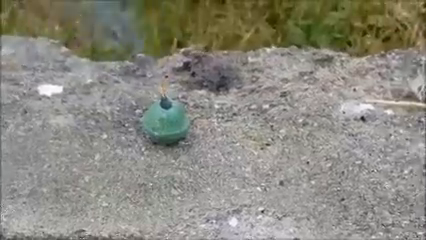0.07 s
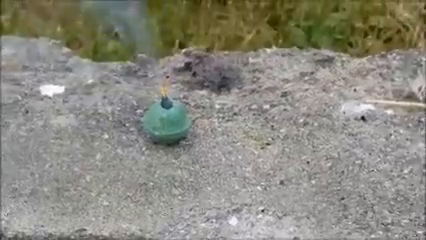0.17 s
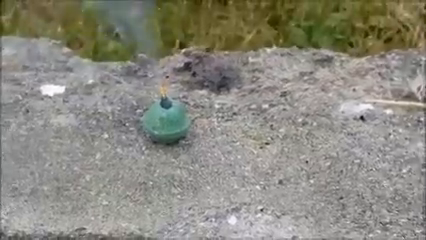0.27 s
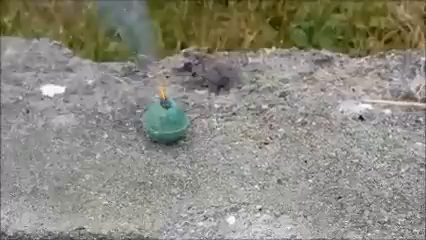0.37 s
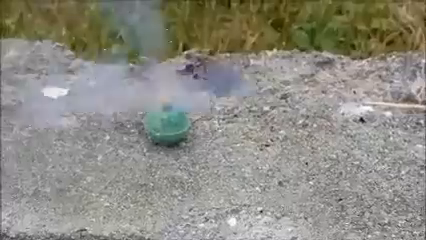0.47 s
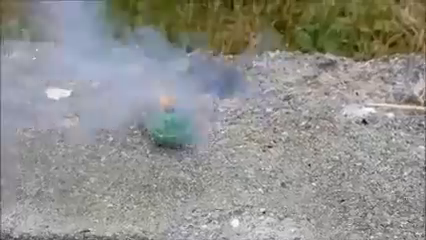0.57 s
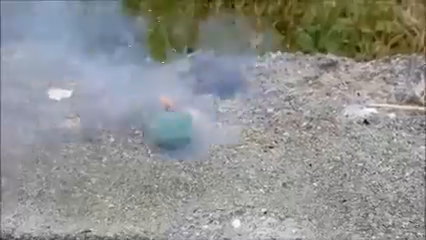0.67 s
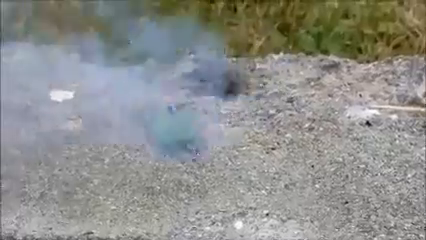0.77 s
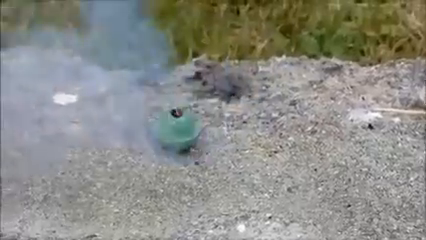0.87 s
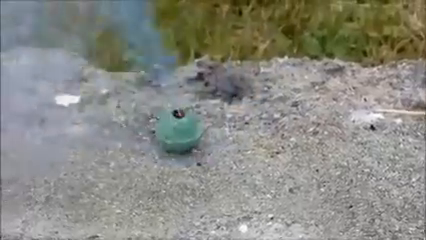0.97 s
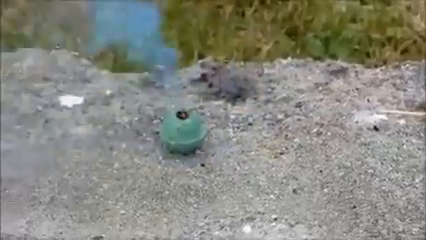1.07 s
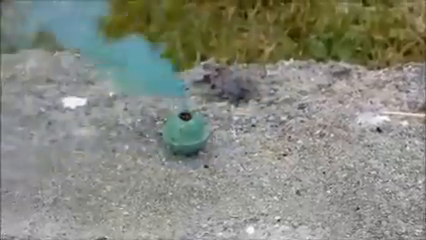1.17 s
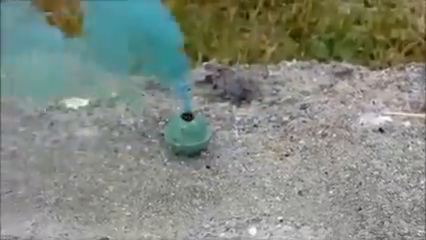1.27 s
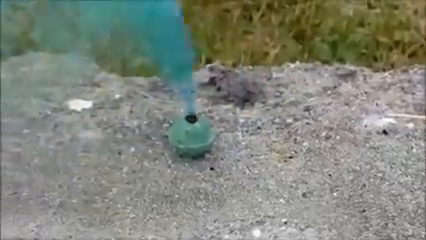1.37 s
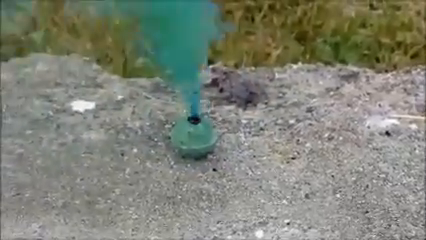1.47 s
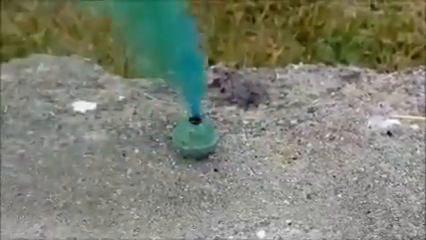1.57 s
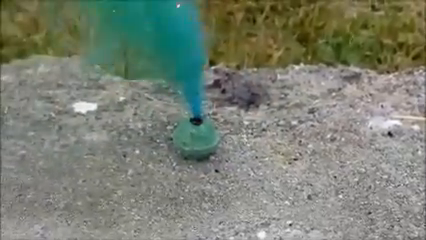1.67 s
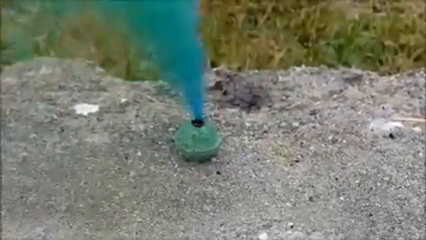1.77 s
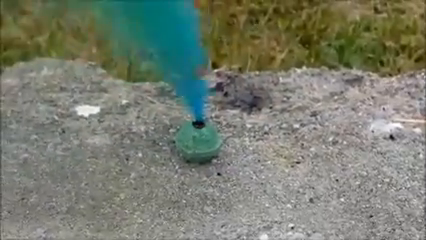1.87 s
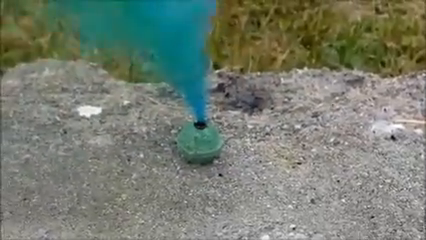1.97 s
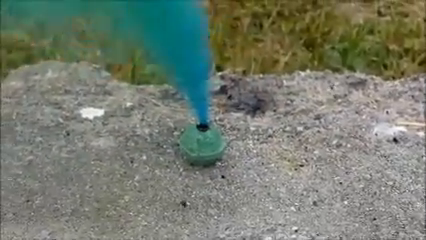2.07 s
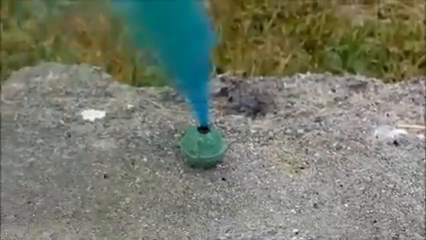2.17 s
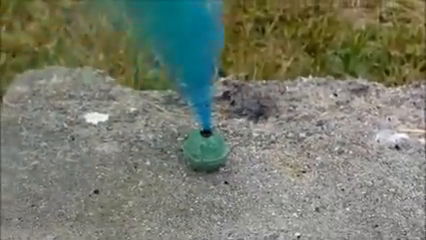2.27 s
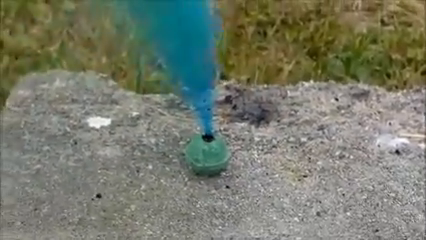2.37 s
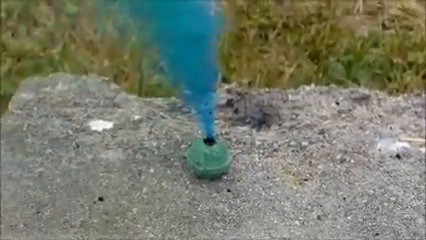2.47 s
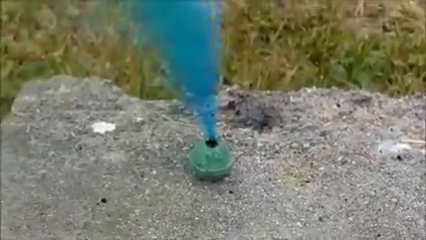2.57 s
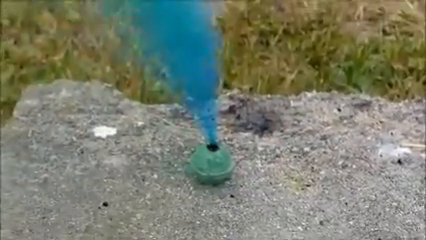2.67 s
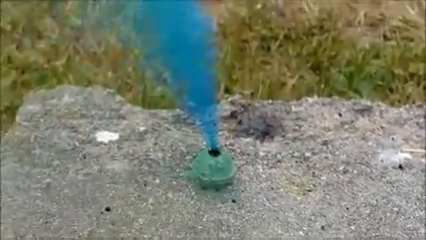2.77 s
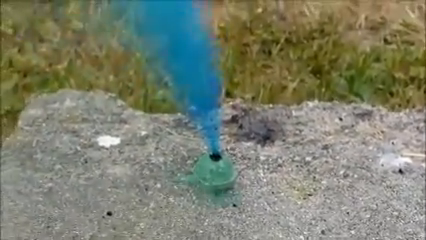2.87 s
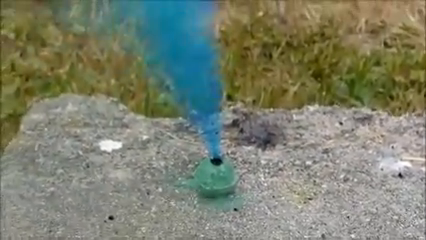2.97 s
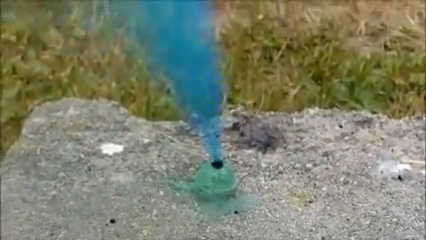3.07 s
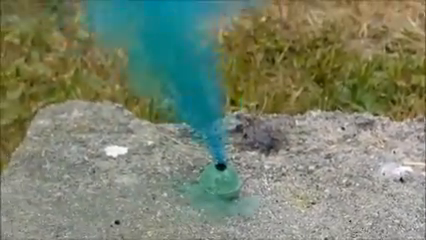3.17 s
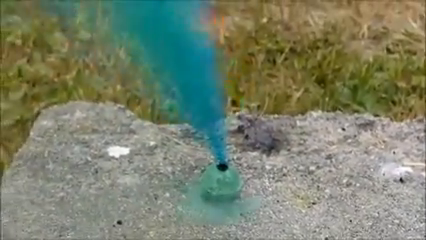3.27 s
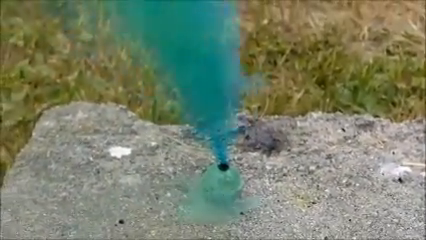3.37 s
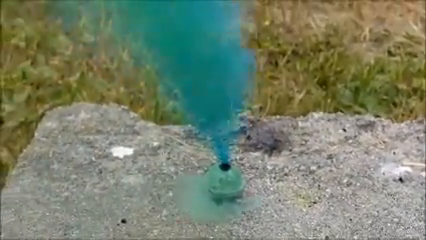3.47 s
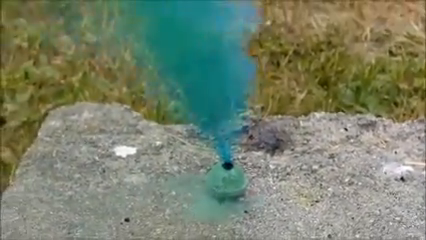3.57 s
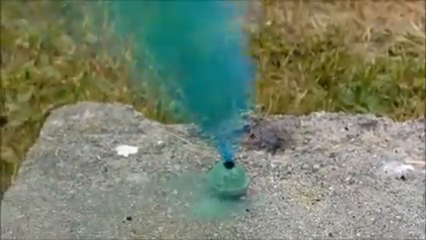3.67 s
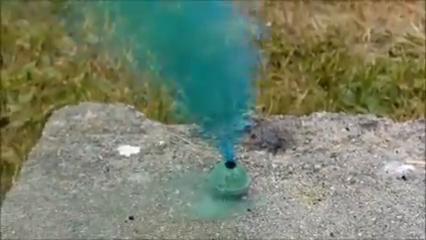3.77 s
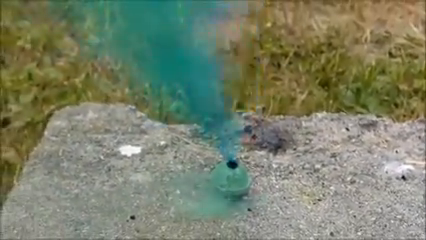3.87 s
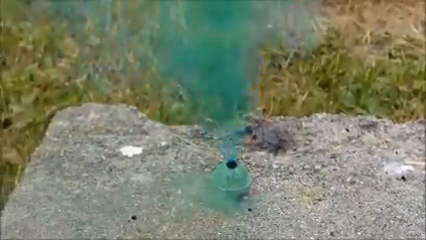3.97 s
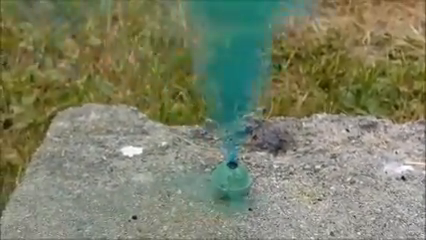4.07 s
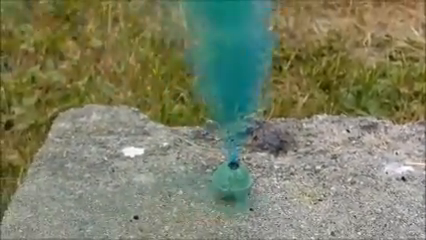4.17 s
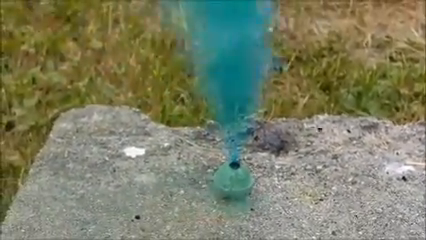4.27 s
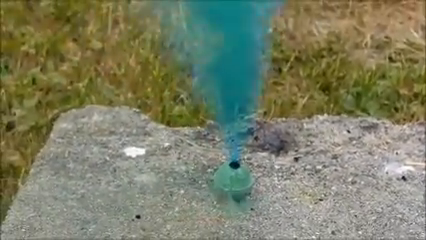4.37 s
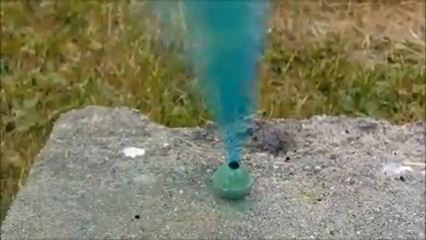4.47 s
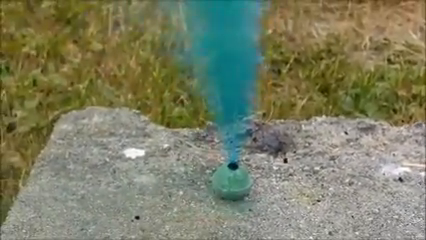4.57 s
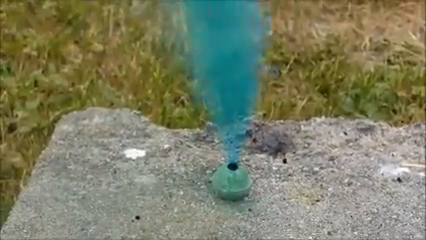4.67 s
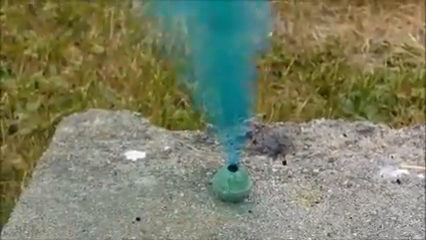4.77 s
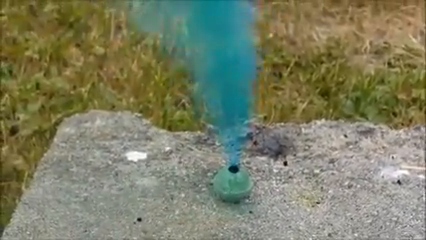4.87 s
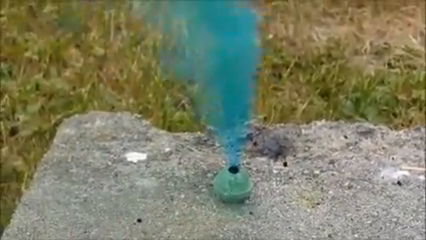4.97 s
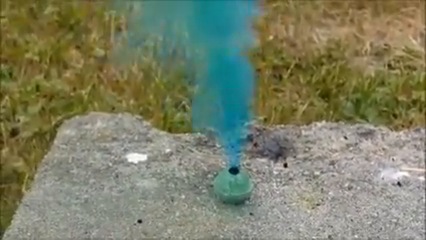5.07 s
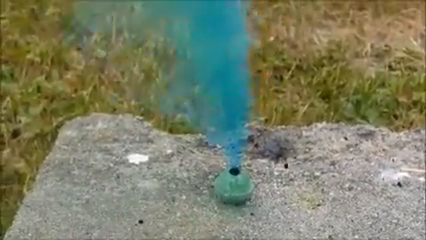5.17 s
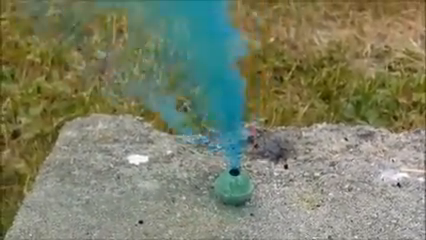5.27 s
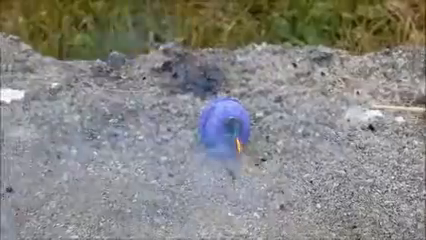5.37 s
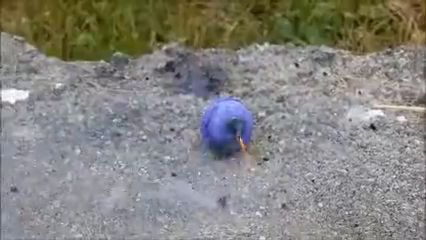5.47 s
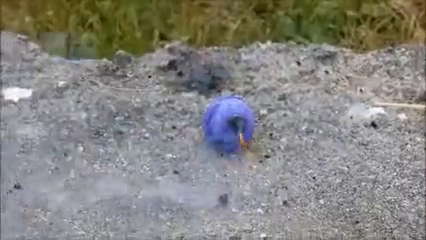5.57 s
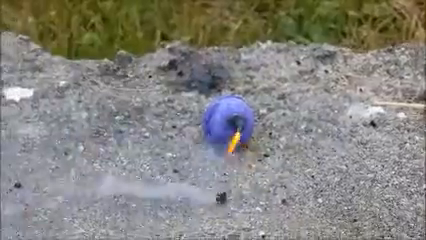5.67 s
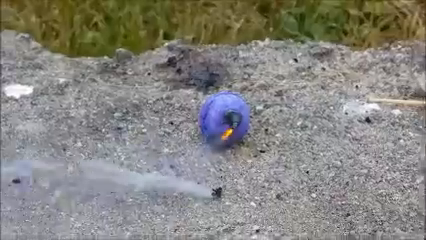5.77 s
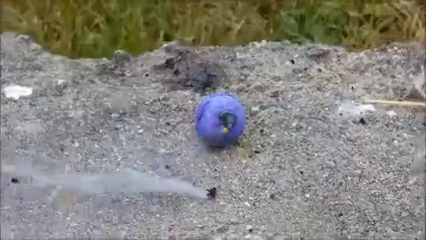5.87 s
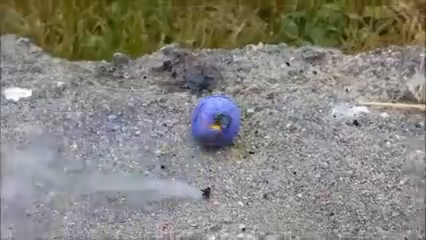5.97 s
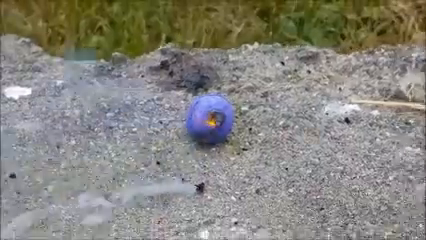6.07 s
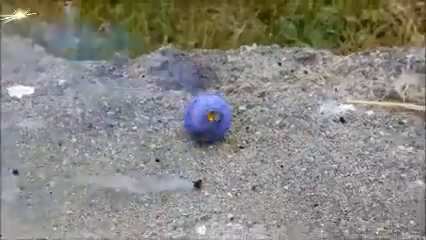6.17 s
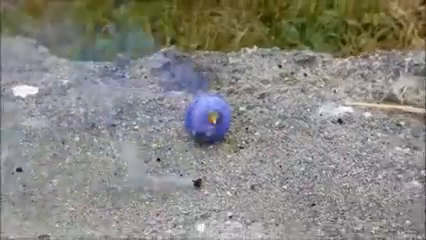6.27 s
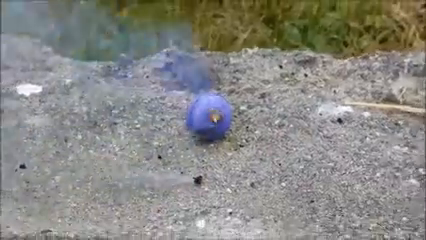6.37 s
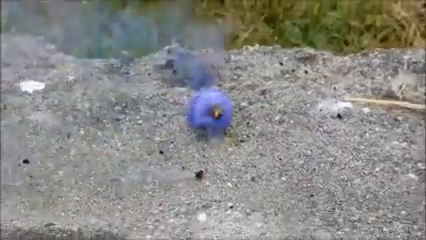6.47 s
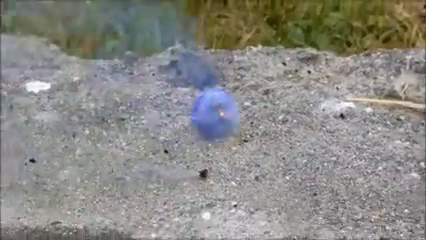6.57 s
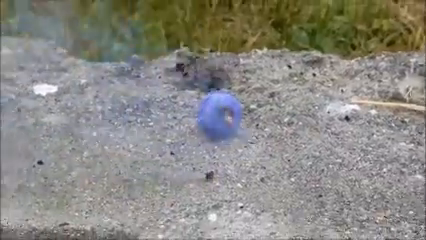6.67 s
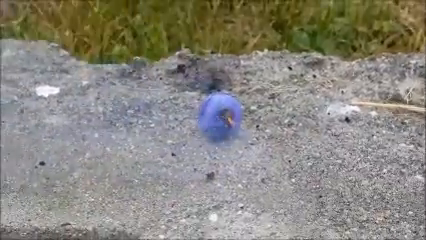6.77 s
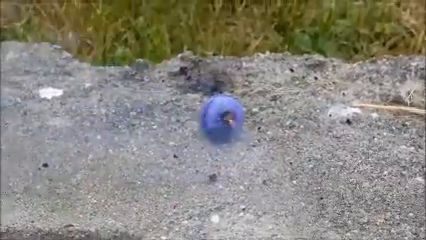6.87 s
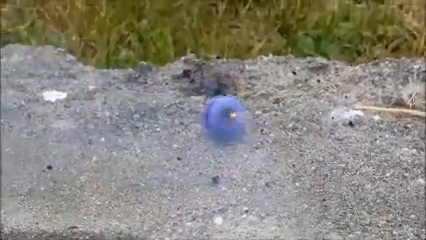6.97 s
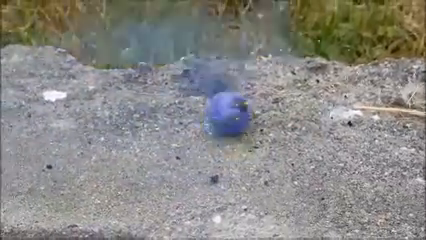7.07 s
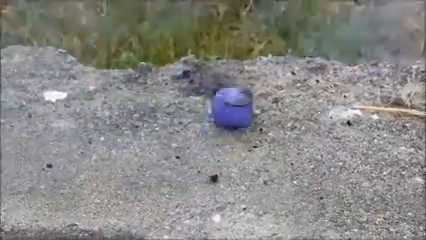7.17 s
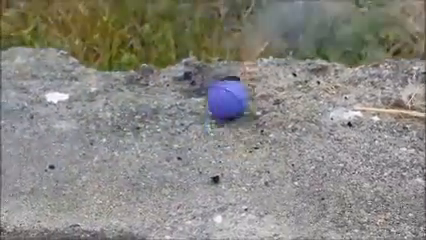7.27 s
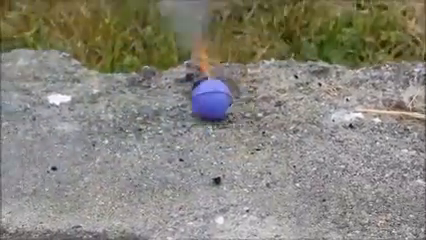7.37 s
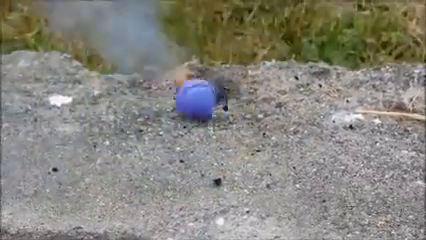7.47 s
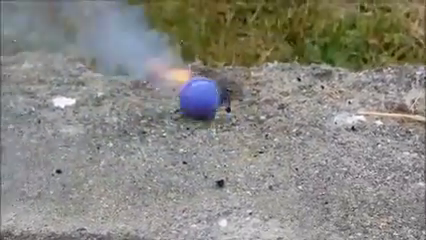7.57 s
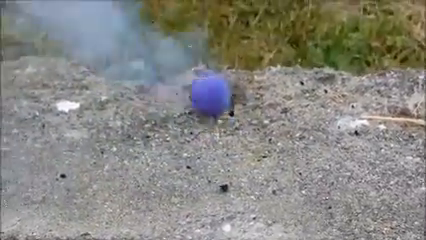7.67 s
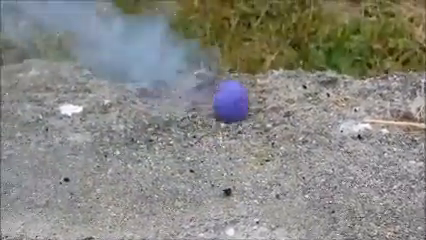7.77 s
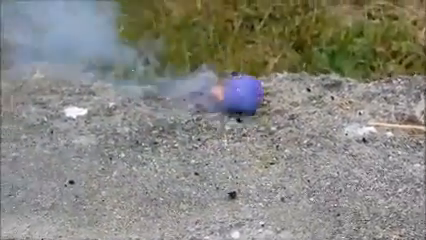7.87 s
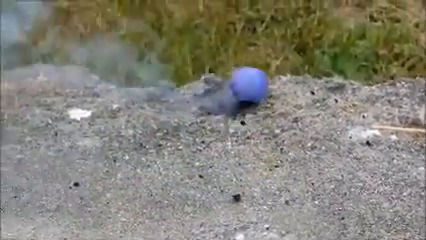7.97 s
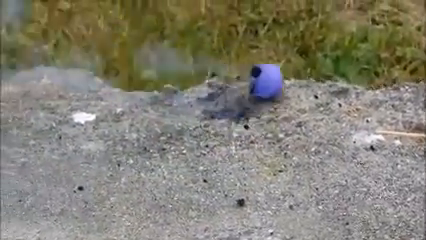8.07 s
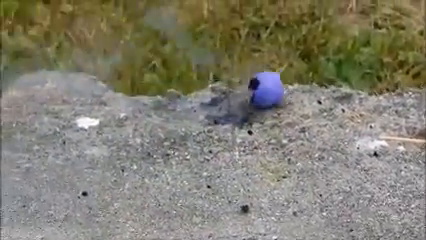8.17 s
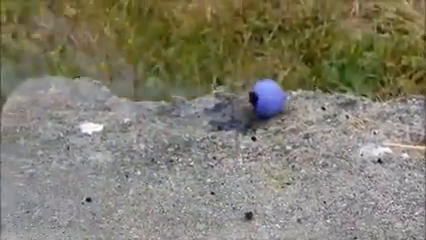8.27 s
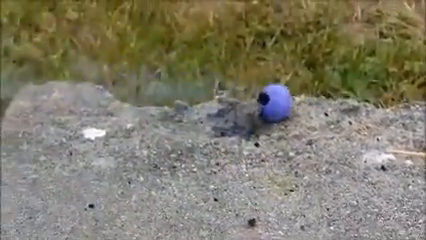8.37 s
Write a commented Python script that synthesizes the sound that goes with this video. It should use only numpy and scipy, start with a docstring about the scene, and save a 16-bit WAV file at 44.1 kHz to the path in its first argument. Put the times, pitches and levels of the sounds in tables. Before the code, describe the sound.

A smoke ball's fuse fizzes, stalls, then hisses into a swelling jet that fades; a second sputters, flares and dies over faint rumble.

```python
"""Far machinery rumbles and hums while two smoke balls burn in turn on a concrete slab, heard in stereo.
A fuse fizzes and stalls; then a green jet swells and dies, its slag popping as noise cracks and damped
sines; a bird whistles in gliding sines; a blue ball sputters, flares and goes out to a faint ember hiss.
Each burn is gas noise and spark impulses, coloured by the vent, with four registers tied to the jet."""
import sys
import numpy as np
from scipy import signal
from scipy.fft import rfft, irfft
from scipy.io import wavfile
from scipy.ndimage import uniform_filter1d

SR = 44100
rng = np.random.default_rng(int(sys.argv[2]) if len(sys.argv) > 2 else 0)


def file_out(sig):
    """Save sig as 16-bit WAV at sys.argv[1]."""
    # one column per channel
    cols = np.atleast_2d(sig).T
    # limit, then scale
    lim = np.clip(cols, -1, 1)
    pcm = np.round(lim * 32767).astype(np.int16)
    wavfile.write(sys.argv[1], SR, pcm)


N = 371322

# stereo transfer of the blue ball and the embers to the two microphone ports:
# (frequency [Hz], left-right level [dB], coherence [0-1], left lead [rad])
BLUE_PORTS = [(520, 2.5, .77, .3), (900, 6.3, .67, .7), (1300, 11.1, .53, .9), (1600, 14.2, .68, .3),
              (2400, 11.6, .62, .3), (3300, 6.7, .52, -.5), (4200, 1.6, .6, .2), (5500, 4.4, .4, -.6),
              (7800, 1.2, .35, 1.6), (9600, -2, .15, .7), (12000, 4, .25, -1.8), (15000, -.6, .3, -2.7)]


def gain_of(db):
    """Level law: 20 dB is a factor of ten in amplitude."""
    return 10 ** (np.asarray(db) / 20)


def evened(x):
    """Normalisation of mean power: scales to rms 1."""
    return x / np.sqrt(np.mean(x ** 2) + 1e-20)


def read(rows, hz):
    """Spectral interpolation: every column joined by straight lines over log frequency."""
    f, *columns = np.transpose(rows)
    return [np.interp(np.log(hz + 1), np.log(f + 1), c) for c in columns]


def follow(rows, t):
    """Temporal interpolation: every column joined by straight lines over time."""
    s, *columns = np.transpose(rows)
    return [np.interp(t, s, c) for c in columns]


def add(mix, s, sound):
    """Superposition: adds a sound to the mix from time s."""
    part = mix[round(s * SR):][:len(sound)]
    part += sound[:len(part)]


def wander(t, rate_hz):
    """Low-passed random fluctuation of rms 1, mostly slower than rate_hz."""
    bin_hz = np.arange(5001) / 10
    spectrum = rfft(rng.standard_normal(10000)) / (1 + (bin_hz / rate_hz) ** 2)
    return np.interp(t, np.arange(10000) / 1000, evened(irfft(spectrum)))


def blotches(shape, bins, frames):
    """Random field of rms 1, correlated over some frequency bins and time frames."""
    field = rng.standard_normal(shape)
    field = uniform_filter1d(field, size=max(round(bins), 1), axis=0)
    field = uniform_filter1d(field, size=max(round(frames), 1), axis=1)
    return evened(field)


def bell(x, centre, width):
    """Gaussian bump of height 1; width is the half width at 1/e."""
    return np.exp(-((x - centre) / width) ** 2)


def rumble(same=0.64):
    """Far machinery: partly coherent low-frequency noise and a frequency-modulated hum."""
    # spectrum of the noise: (frequency [Hz], relative spectral level [dB])
    spectrum = [(20, -16), (35, -11), (55, -5.5), (85, -2), (125, -1), (190, -2.5), (260, -10.5),
                (340, -10.5), (500, -21.5), (900, -30), (3000, -36), (8000, -49)]
    # common swell of noise and hum: (time [s], level change [dB])
    swell = [(0, 0), (2.4, 0), (4.2, 0.5), (5.5, -1), (7.4, 1.5), (8.4, -1)]
    # rms levels ahead of the swell and the port gains
    noise_db, hum_hz, hum_db = -49, 119.9, -58
    shaping = gain_of(read(spectrum, np.fft.rfftfreq(N, 1 / SR))[0])
    shared, *own = evened(irfft(rfft(rng.standard_normal((3, N))) * shaping, N))
    t = np.arange(N) / SR
    # same is the share of power common to both ports
    noise = np.sqrt(same) * shared + np.sqrt(1 - same) * np.array(own)
    noise = noise * gain_of(noise_db + 0.81 * wander(t, rate_hz=6.2))
    turns = np.cumsum(hum_hz + 6 * wander(t, rate_hz=14.6)) / SR
    hum = np.sqrt(2) * np.sin(2 * np.pi * turns) * gain_of(hum_db + 4.7 * wander(t, rate_hz=11))
    return (noise + hum) * gain_of(follow(swell, t)[0]) * gain_of([[.8], [-.8]])


def bird(scatter_db=-18, scatter_t60=0.17):
    """Whistles as frequency-modulated sines, blurred by decaying scatter off grass and ground."""
    # one table a whistle: (time [s], pitch [Hz], rms level ahead of the port gains [dB])
    whistles = [
        [(4.44, 3190, -45), (4.505, 3220, -42.5), (4.52, 3120, -40), (4.53, 3050, -55)],
        [(5.195, 4450, -66), (5.208, 3950, -56), (5.221, 3450, -59), (5.228, 3180, -38), (5.24, 3060, -41),
         (5.254, 3050, -44.5), (5.264, 3200, -35), (5.273, 3230, -50)],
        [(5.272, 2750, -51), (5.283, 2650, -54), (5.31, 2630, -56)],
        [(5.332, 3250, -62), (5.342, 3050, -52), (5.353, 2950, -58), (5.372, 2930, -56), (5.39, 2900, -52)],
    ]
    out = np.zeros(N)
    for rows in whistles:
        t = np.arange(rows[0][0], rows[-1][0], 1 / SR)
        hz, db = follow(rows, t)
        turns = np.cumsum(hz * (1 + 0.0036 * wander(t, rate_hz=140))) / SR
        tone = np.sqrt(2) * np.sin(2 * np.pi * turns) * gain_of(db + 1.6 * wander(t, rate_hz=190))
        add(out, t[0], tone * signal.windows.tukey(len(t), .1))
    t = np.arange(SR // 4) / SR
    # noise tails that fall 60 dB in scatter_t60 seconds
    tails = rng.standard_normal((2, len(t))) * np.exp(-np.log(1000) * t / scatter_t60)
    tails = tails / np.linalg.norm(tails[0])
    scatter = signal.fftconvolve(out[None], tails, axes=1)[:, :N]
    return (out + gain_of(scatter_db) * scatter) * gain_of([[3], [-4]])


def pops():
    """Impulsive release: slag clears the vent with a noise crack and a brief damped pressure wave."""
    # (time [s], level ahead of the port gains [dB], pitch [Hz], time to the envelope's peak [s])
    bursts = [(.785, -23, 1440, 0.00036), (1.2297, -38, 11500, .00007), (1.3716, -35, 11500, .00007),
              (1.552, -28, 573, 0.0014), (3.41, -9, 1860, 0.0004), (3.4112, -24, 450, 0.00069),
              (3.995, -9.5, 1120, 0.00017), (3.9965, -15, 2000, 0.00023), (3.9985, -17, 2300, 0.00025),
              (4.1122, -10, 1900, 0.00013), (4.1447, -15, 2100, 0.0002), (4.1624, -9.5, 1300, 0.00013),
              (4.1648, -26, 400, 0.0005), (4.169, -24, 230, 0.0008), (4.184, -22, 573, 0.0013),
              (4.278, -16, 2000, 0.00013), (5.560, -18.5, 1440, 0.0011), (5.701, -21, 2500, .0005),
              (5.924, -18, 1980, 0.00024), (6.237, -14, 2000, 0.00011), (6.802, -18.5, 2300, 0.00049),
              (7.0528, -14, 2300, 0.0004), (7.062, -16, 2000, 0.00014), (7.080, -14, 1990, 0.00021),
              (7.900, -17, 2000, 0.00012)]
    crack_db, crack_s = -14, 0.0003  # against the wave; decay time constant
    out, t = np.zeros(N), np.arange(SR // 50) / SR
    for s, db, hz, ring in bursts:
        envelope = t / ring * np.exp(1 - t / ring)
        wave = envelope * np.sin(2 * np.pi * hz * t)
        crack = gain_of(crack_db) * np.exp(-t / crack_s) * rng.standard_normal(len(t))
        add(out, s, gain_of(db) * (wave + crack))
    return out * gain_of([[-1], [-9]])


def turbulence(flutter_db, flutter_hz, sparks_per_s, spark_db):
    """Broadband jet noise: two independent gas and spark-impulse streams sharing one flutter."""
    size = rng.uniform(-1.16, 1, (2, N))
    sparks = size * (rng.random((2, N)) < sparks_per_s / SR)
    gas = rng.standard_normal((2, N)) + gain_of(spark_db) * sparks
    return evened(gas * gain_of(flutter_db * wander(np.arange(N) / SR, flutter_hz)))


def showers(t):
    """Incoherent addition: the powers of the spark showers sum as each rises, holds and falls."""
    # (start [s], rise [s], hold [s], fall [s], fizz level ahead of the burn's trim [dB])
    spark_showers = [(-.02, 0.028, 0.17, 0.056, -43.5), (0.286, 0.047, 0.21, .05, -41.5),
                     (0.796, 0.089, 0.27, 0.043, -42.5), (1.19, .02, 0.12, .05, -65),
                     (1.425, 0.065, 0.06, .025, -45.5), (3.19, 0.24, .05, 0.23, -39),
                     (3.855, 0.1, 0.19, 0.4, -36), (4.3, 0.11, 0.14, 0.43, -44),
                     (5.385, .015, 0.84, 0.17, -46), (6.457, 0.036, 0.24, 0.074, -51),
                     (6.958, 0.11, 0.057, .2, -35.5), (7.151, .14, .005, 0.064, -28.5),
                     (7.245, 0.038, 0.017, 0.29, -33), (7.678, 0.065, 0.14, 0.079, -45),
                     (8.152, 0.15, .03, .1, -70)]
    power = 0
    for s, rise, hold, fall, db in spark_showers:
        envelope = np.interp(t, np.cumsum([s, rise, hold, fall]), [0, 1, 1, 0])
        power = power + (gain_of(db) * envelope) ** 2
    return power


def burning(strength, law, unsteady_db, runs_out=False):
    """Source scaling: roar, edge and fizz follow the rush by linear laws in dB; rows of (s, four dB)."""
    # short or long rises and falls in the level of roar and rush:
    # (time [s], half length at 1/e [s], roar change [dB], rush change [dB])
    level_bumps = [(0.014, 0.021, 4, 3), (0.156, 0.036, -2, -1.5), (0.237, 0.028, -5.5, -5),
                   (0.611, 0.13, 7.5, 2.5), (0.694, 0.011, 5, 5), (0.746, 0.059, -0.5, -3),
                   (1.15, .015, 4, 3), (1.38, .05, 6, 3), (1.55, 0.011, 3, 3.5), (1.73, 0.018, 3, 2.5),
                   (3.755, 0.13, -2.5, -1), (3.985, 0.022, 4.5, 0.5), (4.16, 0.034, 6.5, 2),
                   (4.918, 0.34, -4, 0), (5.555, 0.027, 6, 2), (5.623, 0.0067, 6, 7),
                   (5.665, 0.019, 0.5, -4), (5.473, .03, 0.5, 2.5), (5.69, .012, 4, 3), (5.73, .014, 1, -1),
                   (5.778, 0.013, 6.5, 1.5), (5.822, 0.023, 4.5, 4.5), (5.916, 0.011, -1, 3.5),
                   (6.08, .018, 2, 1), (6.265, 0.019, 3.5, 1.5), (6.315, 0.017, 0, -2.5),
                   (6.396, 0.013, 0, -3), (6.438, 0.025, 5, 1), (6.7, 0.029, 3, 7.5),
                   (6.885, 0.016, 4.5, 5.5), (6.926, 0.012, -2, -6), (7.19, .025, -0.5, 2.5),
                   (7.257, 0.047, 3, 2.5), (7.525, 0.3, 6, 2.5)]
    usual_db, shower_edge_db = -37, -9
    # as powder runs out the hiss dulls: start [s], loss of roar, rush, edge, fizz [dB/s]
    spent_s, spent_db_per_s = 4.88, (0, 4, 10, 27)
    t = np.arange(0, N, 128) / SR
    rush = follow(strength, t)[0] + unsteady_db * wander(t, rate_hz=3.1)
    roar, edge, fizz = [usual_db + db + growth * (rush - usual_db) for db, growth in law]
    for s, half_length, roar_db, rush_db in level_bumps:
        bump = bell(t, s, half_length)
        roar = roar + roar_db * bump
        rush = rush + rush_db * bump
    # sparks add power to the upper two registers
    spark_power = showers(t)
    edge = 10 * np.log10(gain_of(edge) ** 2 + gain_of(shower_edge_db) ** 2 * spark_power)
    fizz = 10 * np.log10(gain_of(fizz) ** 2 + spark_power)
    spent_db = runs_out * np.outer(spent_db_per_s, np.maximum(t - spent_s, 0))
    return np.transpose([t, *(np.array([roar, rush, edge, fizz]) - spent_db)])


def jet(drive, burn, colour, ports, notch_db, treble_dip_db, ripple_db, level_db, slide=1):
    """Source-filter principle: vent and slab colour the turbulence, and coherence sets its stereo image."""
    # roar, rush, edge and fizz: (lower limit [Hz], upper limit [Hz])
    registers = [(420, 1200), (1450, 2750), (3600, 6000), (7000, 15500)]
    # notch of the slab's reflection, drifting as the microphones move: (time [s], frequency [Hz])
    notch = [(0, 5960), (2.4, 6030), (3.2, 6180), (4.0, 6400), (4.9, 6430), (5.35, 6300), (5.4, 5700),
             (5.9, 5850), (6.3, 5970), (6.9, 6960), (7.9, 6850)]
    # dip or bump at the top of the rush: (time [s], frequency [Hz], level [dB])
    scoop = [(3.3, 2750, 6), (3.8, 2960, 0), (4.8, 3020, 0), (5.35, 2940, -12), (5.4, 3060, -7)]
    # microphones and vent turn: (time [s], extra left lead [s], beamed treble near 12 kHz [dB])
    turning = [(0, 9e-6, -2.5), (1.5, -9e-6, 4), (1.6, 13e-6, 1.5), (3.2, 3e-6, -3), (4.8, -13e-6, -3.5),
               (5.4, 2e-6, -7), (6.3, -8e-6, -5.5), (6.8, -12e-6, -2.5), (7.3, 25e-6, -2), (7.7, -5e-6, -8)]
    # vent resonance, strongest as the green jet dies: (time [s], frequency [Hz], level [dB])
    vent = [(0, 7850, 4.5), (1.0, 7900, 5), (1.3, 8040, 0), (1.6, 8050, 4.5), (3.4, 8450, 2.5),
            (3.9, 8100, 1.5), (4.3, 7750, 1.5), (4.9, 7660, 9), (5.3, 7550, 17), (5.4, 8260, 4.5),
            (7.5, 7770, -1), (7.9, 7900, 2), (8.4, 7900, 2.5)]
    usual_notch_hz, slide_top_hz, eddy_db = 6000, 7500, 0.95
    hz, t, (a, b) = signal.stft(drive, SR, nperseg=512, noverlap=384)
    f = hz[:, None]
    vent_hz, vent_db = follow(vent, t)
    lag_s, beam_db = follow(turning, t)
    notch_hz = follow(notch, t)[0]
    scoop_hz, scoop_db = follow(scoop, t)
    dips_db = notch_db * bell(f, notch_hz, 250) + scoop_db * bell(f, scoop_hz, 100)
    # broad dip near 9.7 kHz, its depth set for each burn
    dips_db = dips_db + treble_dip_db * bell(f, 9680, 870)
    # spectral peaks below slide_top_hz slide along with the notch
    stretch = 1 + slide * (notch_hz / usual_notch_hz - 1) / (1 + (f / slide_top_hz) ** 10)
    peaks_db = vent_db * bell(f, vent_hz, 520) + beam_db * bell(f, 12000, 3600)
    shape = gain_of(read(colour, f / stretch)[0] + dips_db + peaks_db)
    # eddies come and go quickly; narrow random ripples in frequency change slowly
    field_db = eddy_db * blotches(a.shape, bins=7, frames=6)
    field_db = field_db + ripple_db * blotches(a.shape, bins=1, frames=119)
    # each register is brought to its own level and blends into its neighbours
    for own, (lo, hi), register_db in zip(np.eye(len(registers)), registers, follow(burn, t)):
        power = (shape[(hz > lo) & (hz < hi)] ** 2).sum(0) / len(hz)
        blend = np.interp(f, np.ravel(registers), np.repeat(own, 2))
        field_db = field_db + blend * (register_db - 10 * np.log10(power))
    # the ports hear partly the same sound, the right one rescaled and shifted in phase
    balance_db, same, lead = read(ports, f)
    lead = lead + 2 * np.pi * f * lag_s
    right_gain = gain_of(-balance_db)
    right = right_gain * (same * a * np.exp(-1j * lead) + np.sqrt(1 - same ** 2) * b)
    # levels refer to the mean of the two ports
    centre = np.sqrt(1 + right_gain ** 2 + 2 * right_gain * same * np.cos(lead)) / 2
    z = np.array([a, right]) / centre * shape * gain_of(field_db + level_db)
    z *= f ** 2 / (f ** 2 + 170 ** 2)  # so small a vent makes little bass
    return signal.istft(z, SR, nperseg=512, noverlap=384)[1][:, :N]


# In each burn below, strength is the level of the rush ahead of level_db: (time [s], level [dB]).
# law gives roar, edge and fizz: (level against the rush at usual strength [dB], growth [dB/dB]).
# colour is the spectrum within the registers: (frequency [Hz], relative spectral level [dB]).
def embers_hiss():
    """Weak turbulence: smouldering gas hisses faintly, with few but strong spark impulses."""
    # (time [s], level [dB])
    strength = [(1.2, -59), (1.29, -61.5), (1.36, -55.5), (1.44, -53), (7.95, -50.5), (8.03, -52),
                (8.15, -57), (8.42, -58.5)]
    # (level against the rush [dB], growth [dB/dB])
    law = [(-4.5, 1.15), (-7, 1.08), (-13, 0.71)]
    # (frequency [Hz], relative spectral level [dB])
    colour = [(200, -7), (800, -3.5), (1300, 0.5), (2500, -1), (3300, -3.5), (4000, -5.5), (5000, -12),
              (7900, -12), (12000, -9), (15600, -14)]
    drive = turbulence(flutter_db=0.4, flutter_hz=60, sparks_per_s=250, spark_db=18)
    return jet(drive, burning(strength, law, unsteady_db=1.1), colour, BLUE_PORTS,
               notch_db=-7, treble_dip_db=-16, ripple_db=0.5, level_db=-5.0, slide=0)


def fuse_fizz():
    """Jet noise of the green ball's fuse, with dense spark impulses."""
    # (time [s], level [dB])
    strength = [(0.0, -37), (0.258, -38.5), (0.284, -36.5), (0.546, -37.5), (0.8, -38.5), (0.95, -39),
                (1.162, -44), (1.2, -55), (1.42, -51), (1.48, -42), (1.57, -39.5)]
    # (level against the rush [dB], growth [dB/dB])
    law = [(-7.5, 1.37), (-13, 3), (-9, 0.9)]
    # (frequency [Hz], relative spectral level [dB])
    colour = [(200, 3), (370, -9), (520, 1), (1000, -1), (1250, -2), (1620, 5), (1900, 0.5), (2270, 5),
              (2550, -1.5), (2950, -1.5), (3350, -17.5), (4200, -18), (5000, -23), (6000, -17),
              (7900, -17.5), (12000, -12.5), (15600, -18)]
    # (frequency [Hz], left-right level [dB], coherence [0-1], left lead [rad])
    ports = [(520, 4.4, .74, .3), (900, 7.9, .69, 1), (1300, 16, .38, 1.5), (1600, 14.6, .73, .6),
             (2400, 10.6, .61, .6), (3300, 3.1, .2, -2), (4200, 3.9, .35, -4.8), (5500, 6.8, .25, -4.2),
             (7800, 4, .65, -3), (9600, -10, .1, -3.9), (12000, 9.2, .45, -6.1), (15000, 2.8, .3, -5.9)]
    drive = turbulence(flutter_db=0.6, flutter_hz=30, sparks_per_s=1400, spark_db=12)
    return jet(drive, burning(strength, law, unsteady_db=0.4), colour, ports,
               notch_db=-12, treble_dip_db=-10.0, ripple_db=1.5, level_db=-1.25)


def green_jet():
    """Jet noise of the green ball: it swells, then loses treble fastest as the powder runs out."""
    # growth and then full burn: (time [s], level [dB])
    swell = [(1.6, -42.5), (1.85, -40.5), (2.368, -38.5), (3.156, -36), (3.38, -35)]
    full_burn = [(3.5, -33), (3.66, -34.5), (3.75, -33), (3.83, -35), (3.96, -32), (4.15, -32), (4.45, -37),
                 (4.9, -41), (5.08, -41.5), (5.26, -46), (5.37, -49.5)]
    # (level against the rush [dB], growth [dB/dB])
    law = [(-8.5, 0.84), (-11.5, 1.51), (-8.5, 1.75)]
    # (frequency [Hz], relative spectral level [dB])
    colour = [(200, -8.5), (380, -17.5), (500, -4.5), (800, -5.5), (1000, -4.5), (1330, -6), (1570, 2.5),
              (1930, -1), (2270, 2), (2600, -4.5), (2980, -3.5), (3200, -8), (3450, -14.5), (3700, -7),
              (4300, -12), (4900, -13.5), (6200, -11), (7900, -6), (12000, -4.5), (14000, -8.5),
              (15600, -20)]
    # (frequency [Hz], left-right level [dB], coherence [0-1], left lead [rad])
    ports = [(520, 3.7, .71, .3), (900, 6.5, .63, 1), (1300, 13.6, .32, 1.7), (1600, 14.6, .72, .5),
             (2400, 10.3, .68, .3), (3300, 8.8, .4, -.6), (4200, .4, .38, 1), (5500, .3, .3, .3),
             (7800, 2.8, .7, 2.5), (9600, -6.2, .15, .9), (12000, 8.9, .45, -.8), (15000, .9, .4, -2.5)]
    drive = turbulence(flutter_db=0.38, flutter_hz=40, sparks_per_s=1200, spark_db=10.5)
    burn = burning(swell + full_burn, law, unsteady_db=0.44, runs_out=True)
    return jet(drive, burn, colour, ports,
               notch_db=-7.0, treble_dip_db=-10.5, ripple_db=1.37, level_db=-1)


def blue_sputter(drive):
    """Unsteady jet noise of the blue ball, its upper registers growing little with strength."""
    # (time [s], level [dB])
    strength = [(5.41, -34.5), (5.83, -35.5), (6.27, -34.5), (6.6, -44.5)]
    # (level against the rush [dB], growth [dB/dB])
    law = [(-8, 0.88), (-11.5, 0.25), (-12, 0.24)]
    # (frequency [Hz], relative spectral level [dB])
    colour = [(200, -7), (370, -9.5), (500, -4.5), (1200, -5), (1380, -2.5), (1680, 0), (1900, -2),
              (2400, -2.5), (2980, -2), (3250, -6), (3750, -11), (4200, -13), (6200, -21.5), (7900, -19),
              (12000, -14.5), (15600, -24)]
    return jet(drive, burning(strength, law, unsteady_db=0.5), colour, BLUE_PORTS,
               notch_db=-2, treble_dip_db=-6.5, ripple_db=2.5, level_db=-1.12)


def blue_flare(drive):
    """Stronger jet noise as the blue ball flares, its edge growing faster than its rush."""
    # (time [s], level [dB])
    strength = [(6.68, -38.5), (6.742, -37), (7.0, -32), (7.043, -28.5), (7.051, -22.5), (7.085, -26.5),
                (7.115, -30), (7.18, -33.5), (7.28, -30), (7.736, -33), (7.91, -35.5), (7.945, -47)]
    # (level against the rush [dB], growth [dB/dB])
    law = [(-8, 0.79), (-8, 1.21), (-13.5, 0.79)]
    # (frequency [Hz], relative spectral level [dB])
    colour = [(200, -7.5), (370, -13.5), (520, -4), (1000, -4), (1350, -3.5), (1600, 3), (1850, -0.5),
              (2250, 2.5), (2550, -4), (3050, -1), (3480, -12), (4200, -10.5), (5200, -17.5), (6200, -19.5),
              (7900, -11.5), (12000, -12.5), (15600, -13.5)]
    return jet(drive, burning(strength, law, unsteady_db=-0.5), colour, BLUE_PORTS,
               notch_db=-2, treble_dip_db=-11.5, ripple_db=0.5, level_db=-2.0, slide=0)


def burns():
    """Equal-power crossfades join the burns in turn; embers take over when the burning stalls."""
    fuse, green = fuse_fizz(), green_jet()
    sputter = turbulence(flutter_db=0.95, flutter_hz=60, sparks_per_s=1000, spark_db=11.5)
    blue, flare = blue_sputter(sputter), blue_flare(sputter)
    embers = embers_hiss()
    t = np.arange(N) / SR
    caught = np.interp(t, [1.555, 1.58], [0, 1])
    second = np.interp(t, [5.384, 5.394], [0, 1])
    flaring = np.interp(t, [6.45, 6.7], [0, 1])
    shares = [1 - caught, caught * (1 - second), second * (1 - flaring), flaring]
    alight = sum(np.sqrt(share) * stage for share, stage in zip(shares, [fuse, green, blue, flare]))
    stalled = np.interp(t, [1.18, 1.2, 1.4, 1.46, 7.925, 7.95], [0, 1, 1, 0, 0, 1])
    return np.sqrt(1 - stalled) * alight + np.sqrt(stalled) * embers


def scene():
    """Superposition of all sources in the open air."""
    return rumble() + bird() + pops() + burns()


def record(dry):
    """Linear filtering: a drifting low band is hollowed out, then the microphones' band limit applies."""
    # centre of the hollow band: (time [s], frequency [Hz])
    hollow = [(0, 360), (3.0, 365), (4.3, 385), (4.8, 410), (5.3, 410), (5.45, 350), (8.4, 375)]
    hollow_width_hz, hollow_db, edge_hz = 45, -8.5, 15750
    hz, t, z = signal.stft(dry, SR, nperseg=4096, noverlap=3072)
    z = z * gain_of(hollow_db * bell(hz[:, None], follow(hollow, t)[0], hollow_width_hz))
    heard = signal.istft(z, SR, nperseg=4096, noverlap=3072)[1][:, :N]
    low_pass = signal.firwin(511, edge_hz, window=("kaiser", 9), fs=SR)
    return signal.oaconvolve(heard, low_pass[None], "same")


dry = scene()
out = record(dry)
file_out(out)
```